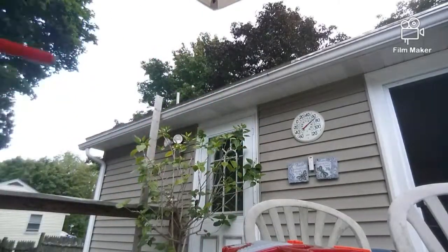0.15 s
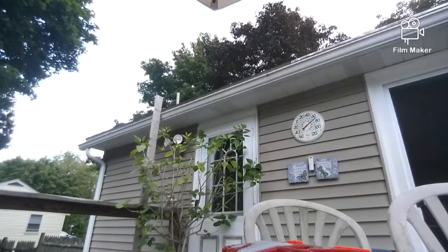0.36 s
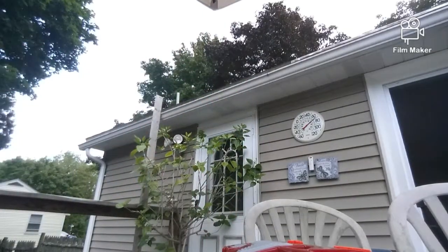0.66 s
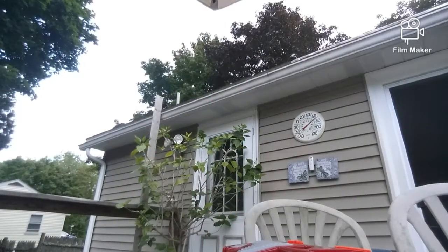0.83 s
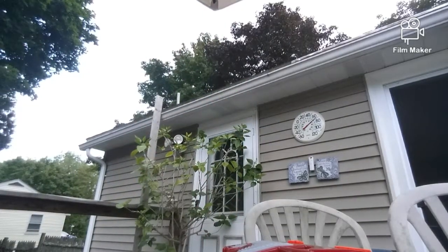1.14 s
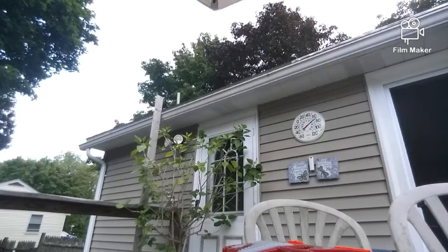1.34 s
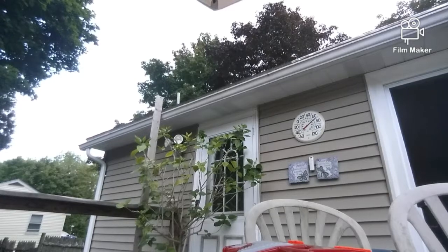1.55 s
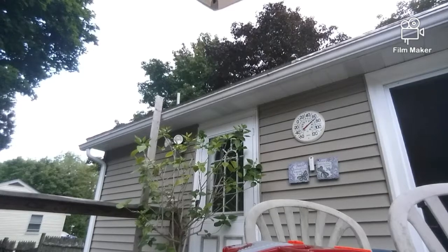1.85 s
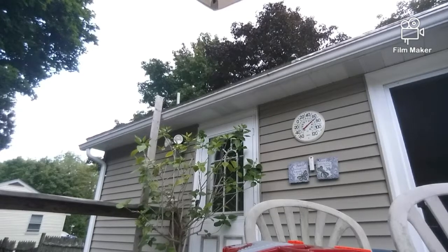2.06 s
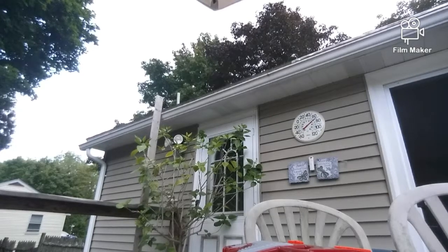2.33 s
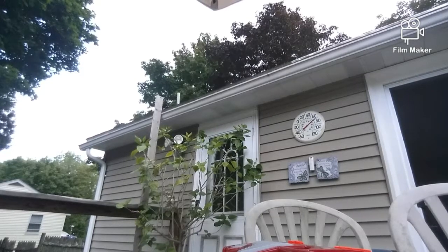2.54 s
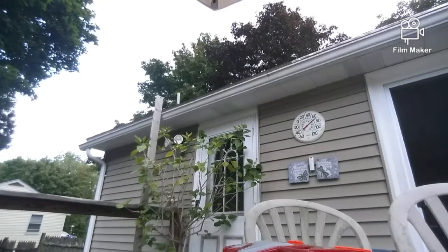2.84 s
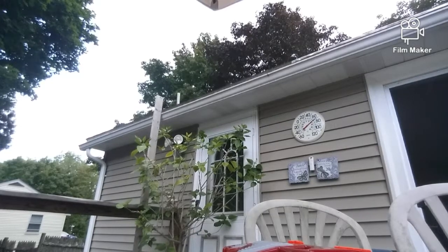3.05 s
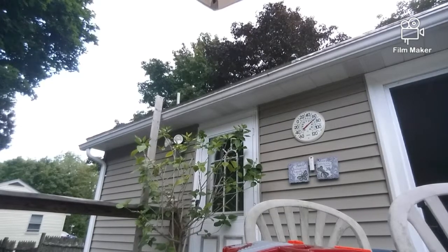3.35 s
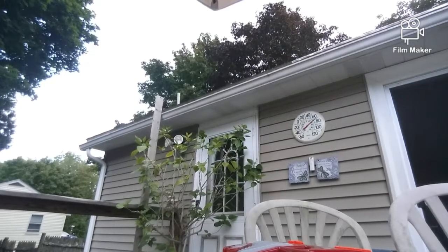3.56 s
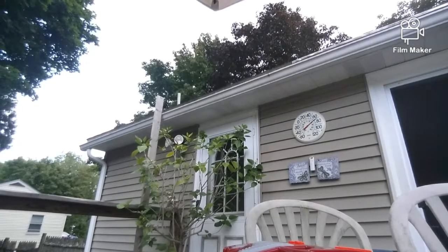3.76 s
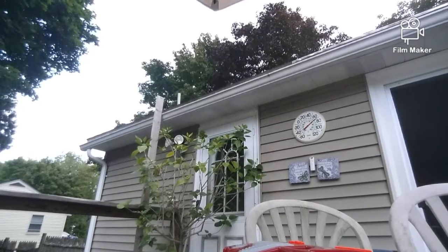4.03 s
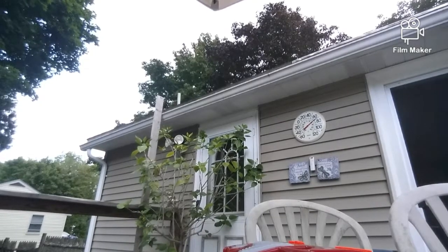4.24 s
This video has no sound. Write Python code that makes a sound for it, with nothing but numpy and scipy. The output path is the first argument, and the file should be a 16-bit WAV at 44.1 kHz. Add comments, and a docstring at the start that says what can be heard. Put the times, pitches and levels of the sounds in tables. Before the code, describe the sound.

Close handling bumps and rumble, then a toy cork gun pops loudly and the cork thumps against something nearby.

```python
"""Toy cork gun on a garden deck

A cork gun is handled and fired beside a phone. The trigger scrapes, the cork pops with a fast rising
note as the piston shortens the barrel's air column, and the piston slams home. The cork thumps against
something near by and drops; deck and house wall reflect the sound. Hands rumble and scuff on the phone.
The background sinks for about a second after the shot and returns as the hand takes hold again."""
import sys
import numpy as np
from scipy import signal
from scipy.fft import rfft, irfft
from scipy.io import wavfile

SR = 44100
rng = np.random.default_rng(int(sys.argv[2]) if len(sys.argv) > 2 else 0)


def transcribe(u):
    """Save the signal u as a 16-bit wav file named by the first command-line argument.

    u: samples, shape (n,) or (channels, n), limited to [-1, 1]; the rate is SR.
    q: integer samples, one column per channel.
    """
    v = np.clip(np.atleast_2d(u).T, -1, 1)
    q = np.round(v * 32767).astype(np.int16)
    wavfile.write(sys.argv[1], SR, q)


N = 193775
T = np.arange(N) / SR

# spectra of the open-air murmur and the microphone hiss: (frequency [Hz], gain [dB])
MURMUR_SPECTRUM = [(100, -6), (250, 5.5), (450, -1), (900, -10.5), (1400, -21), (2500, -33), (6000, -54.5)]
HISS_SPECTRUM = [(1000, -12), (3000, -14), (5400, -14), (6150, -8.5), (7000, -30), (10000, -30.5),
                 (11000, -9), (12100, 4), (13200, -0.5), (14500, -5.5), (16000, -9.5)]
# the hand shifts on the phone and settles: (time [s], rise [s], relative level [dB], fall [dB/s])
GRIP_SHIFTS = [(-.05, 0.1, -45, 6), (.105, .05, -28.5, 7), (1.24, 0.023, -29, 34), (2.26, 0.04, -27, 300.5),
               (3.075, 0.024, -34, 66), (3.25, 0.17, -39, 1.5), (3.59, 0.073, -24, 17)]
# soft bumps on the case: (time [s], frequency [Hz], level [dB], decay time [s])
CASE_BUMPS = [(0.219, 215, -20.5, 0.022), (.292, 200, -24, .014), (0.549, 146.7, -13.5, 0.013),
              (0.639, 99, -17.5, 0.019), (0.819, 76.3, -11.5, 0.016), (1.272, 130, -23, 0.02),
              (3.091, 148.1, -43.5, 0.041), (3.606, 291, -32, .025), (3.784, 682, -18.5, 0.002),
              (3.786, 59.6, -10, 0.033), (3.800, 127.2, -16.5, 0.04), (3.972, 141.6, -20, 0.021)]
# skin scuffing the case: (time [s], duration [s], level [dB], grit relative to that level [dB])
SKIN_STROKES = [(.271, 0.045, -40, -20), (.358, 0.046, -39, -20), (0.443, 0.032, -43, -20),
                (.648, 0.064, -43.5, -18), (0.808, 0.014, -37, -22), (.838, 0.025, -44, -20),
                (1.246, 0.025, -43, -26.5), (1.282, 0.02, -43.5, -25), (1.336, 0.074, -46.5, -20),
                (1.619, 0.013, -41, -28), (3.6, 0.06, -45.5, -46.5), (3.697, 0.0089, -46.5, -29),
                (3.757, .012, -44.5, -29), (3.861, 0.033, -44, -31), (3.917, 0.065, -41.5, -34)]
# spectra of the grip's rumble, the dull scuff and its grit: (frequency [Hz], gain [dB])
RUMBLE_SPECTRUM = [(12, -33.5), (20, 1), (49, -3), (86, 1.5), (125, -3.5), (158, -1), (313, -19.5),
                   (380, -17.5), (428, -31.5), (483, -30.5), (700, -39.5), (910, -58.5), (1540, -120)]
SCUFF_SPECTRUM = [(80, -13.5), (250, 10.5), (600, 0), (1000, -5.5), (1800, -27.5), (3000, -46),
                  (8000, -65.5)]
GRIT_SPECTRUM = [(400, -21.5), (1200, 3), (2200, -5), (3200, -21.5), (8000, -42.5)]
# transmission across the case to the right microphone port: (frequency [Hz], gain [dB])
CASE_TRANSMISSION = [(40, -21.5), (90, -18), (160, -13), (400, -12), (1500, -18)]
# fingers and trigger sliding on plastic, and a faint high hiss just before the shot (at 2.13 s):
# (time [s], duration [s], relative level [dB])
RUBS_AND_HISS = [(0.038, 0.057, -47.5), (.218, 0.021, -54), (0.519, 0.032, -52.5), (0.644, 0.07, -43),
                 (.684, 0.084, -41.5), (0.797, 0.026, -44.5), (0.925, 0.0089, -43), (0.94, .01, -37),
                 (1, 0.054, -53), (2.13, .14, -52), (2.253, 0.025, -21.5), (4.102, 0.01, -53),
                 (4.29, .07, -56.5)]
# plastic parts of the gun knocking: (time [s], relative level [dB], decay time [s])
PART_IMPACTS = [(2.2978, -9, 0.0027), (2.3020, -8.5, 0.002), (2.3128, -7.5, .0016), (2.3159, -3, 0.00091),
                (2.317, -17.5, .005), (2.388, -32, 0.0052)]
# modes of barrel and stock: (frequency [Hz], relative level [dB], time to fall 60 dB [s])
BARREL_MODES = [(178.9, -8, .14), (247, -6, .12), (395, -13.5, .13), (512.6, -7, .17), (678, 0.5, .16),
                (746, -6, .14), (885, -9, 0.2), (990, -9.5, 0.15), (1151, 0.5, 0.19), (1930, -19.5, .13),
                (2200, -21.5, .12), (3600, -21, .09)]
# spectra of the rubs and faint hiss, clacks, the cork's hit and its landing: (frequency [Hz], gain [dB])
RUB_AND_HISS_SPECTRUM = [(200, -19.5), (900, -1.5), (2200, 6), (3500, -12), (6000, -18), (10000, -14),
                         (13000, -4.5), (16000, -11)]
CLACK_SPECTRUM = [(80, -4.5), (200, 4.5), (500, 3.5), (1100, 1.5), (1600, -5), (2200, 7.5), (3000, -10),
                  (3700, -6.5), (5000, -17.5), (8000, -20), (16000, -18)]
HIT_SPECTRUM = [(60, -20), (150, -21), (260, -7.5), (400, 3), (520, 7), (620, 2), (780, -5), (1300, -10),
                (2100, -12), (3500, -23.5), (6000, -36.5), (10000, -36), (16000, -29.5)]
LANDING_SPECTRUM = [(100, -2.5), (350, 7.5), (700, -5), (1500, -14.5), (2700, -9), (3600, -36), (9000, -45),
                    (16000, -44)]
# microphone ports, the left muffled, the right with a treble resonance: (frequency [Hz], gain [dB])
LEFT_RESPONSE = [(100, -3), (650, 7), (1100, -9), (2100, -15), (3800, -8.5), (7000, -8.5), (12000, -18.5),
                 (16000, -20.5)]
RIGHT_RESPONSE = [(100, 8.5), (7500, -5), (10000, 7.5), (11300, 18), (12600, 28.5), (13600, 23),
                  (15000, 17.5), (16000, 12.5)]
# spectra of the low drone and of the near and far reflections: (frequency [Hz], gain [dB])
DRONE_SPECTRUM = [(20, -7.5), (90, 6.5), (170, 0), (300, -10), (700, -50)]
NEAR_SPECTRUM = [(100, -5.5), (500, -4), (1100, -1), (4000, 4), (13000, 1.5)]
FAR_SPECTRUM = [(100, 1), (600, -1.5), (2000, 4), (5000, 2), (13000, -4)]


def undb(db):
    """Amplitude ratio of a level in decibels."""
    return 10 ** (np.asarray(db) / 20)


def unit(x):
    """Normalisation to rms 1."""
    return x / np.sqrt(np.mean(x ** 2))


def colour(x, spectrum, size=8192):
    """Minimum-phase filter through points of (frequency [Hz], gain [dB])."""
    hz, db = np.transpose(spectrum)
    grid_hz = np.maximum(np.fft.rfftfreq(size, 1 / SR), 1)
    gain = undb(np.interp(np.log(grid_hz), np.log(hz), db))
    cepstrum = irfft(np.log(gain))
    cepstrum[1:size // 2] *= 2  # folding onto positive time makes the filter causal
    cepstrum[size // 2 + 1:] = 0
    return signal.fftconvolve(x, irfft(np.exp(rfft(cepstrum))))[:N]


def noise(spectrum):
    """Filtered Gaussian noise of rms 1."""
    return unit(colour(rng.standard_normal(N), spectrum))


def drift(rate_hz):
    """Interpolated random fluctuation with a spread near 1."""
    return np.interp(T * rate_hz, np.arange(N), rng.standard_normal(N))


def ramp(start, length):
    """Linear rise from 0 to 1."""
    return np.clip((T - start) / length, 0, 1)


def fade(start, decay, hold=0):
    """Sudden onset, optional hold, then exponential decay."""
    return (T >= start) * np.exp(-np.clip((T - start - hold) / decay, 0, 50))


def swell(start, rise, db, fall_db_per_s):
    """Linear rise to a level, then exponential decay."""
    return ramp(start, rise) * undb(db - np.clip(fall_db_per_s * (T - start - rise), 0, 200))


def stroke(start, length, skew=0.62):
    """Half-sine envelope that builds quickly and releases slowly; a smaller skew peaks sooner."""
    return np.sin(np.pi * ramp(start, length) ** skew)


def dip(fall_s=0.66, start_s=2.32, return_s=3.45, rise_s=0.36):
    """Depth, 0 to 1, to which the background sinks after the shot."""
    return ramp(start_s, fall_s) * (1 - ramp(return_s, rise_s))


def background(hiss_levels_db=(-69, -66.5)):
    """Ambient noise: a murmur partly coherent between the ports, over incoherent drone and hiss."""
    dip_db = -25.5 * dip()
    shared = noise(MURMUR_SPECTRUM)
    murmur = np.array([shared + noise(MURMUR_SPECTRUM) for _ in range(2)])
    murmur *= undb(-55 + dip_db + 2.1 * drift(2))
    drone = np.array([noise(DRONE_SPECTRUM) for _ in range(2)]) * undb(-55 + 0.67 * dip_db)
    hiss_dip_db = -27.5 * dip(fall_s=0.4)
    hiss = np.array([undb(db + hiss_dip_db) * noise(HISS_SPECTRUM) for db in hiss_levels_db])
    return murmur + drone + hiss


def bumps(contact_s=0.0022):
    """Damped vibration of the case after each soft impact."""
    return sum(undb(db) * ramp(start, contact_s) * fade(start, decay)
               * np.sin(2 * np.pi * hz * (T - start)) for start, hz, db, decay in CASE_BUMPS)


def judder(start_s=0.535, length_s=0.17, start_hz=147.8, sag_hz_per_s=75):
    """Stick-slip oscillation of a fingertip on the case, slowing as it goes."""
    slip_hz = start_hz - sag_hz_per_s * np.clip(T - start_s, 0, length_s)
    pressure = stroke(start_s, length_s, skew=0.86) * undb(-18 + 2 * drift(140))
    return pressure * np.sin(2 * np.pi * np.cumsum(slip_hz * (T >= start_s)) / SR)


def scuffs(grain_db=4):
    """Sliding friction of skin on the case: a dull scrape with some grit on top."""
    dull, grit = noise(SCUFF_SPECTRUM), noise(GRIT_SPECTRUM)
    scrapes = sum(stroke(start, length) * undb(db) * (dull + undb(grit_db) * grit)
                  for start, length, db, grit_db in SKIN_STROKES)
    return undb(grain_db * drift(300)) * scrapes


def handling(right_rumble_db=-16, flutter_db=2, dip_db=-10.5):
    """Structure-borne sound: rumble, bumps and friction cross the case, mostly to the left port."""
    grip = np.sqrt(sum(swell(*shift) ** 2 for shift in GRIP_SHIFTS))  # the shifts add in power
    envelope = grip * undb(flutter_db * drift(35) + dip_db * dip())
    left = envelope * noise(RUMBLE_SPECTRUM) + bumps() + judder() + scuffs()
    right_rumble = undb(right_rumble_db) * envelope * noise(RUMBLE_SPECTRUM)
    return np.array([left, colour(left, CASE_TRANSMISSION) + right_rumble])


def reflections(x):
    """Reverberation: dense reflections from deck and furniture, a faint tail from house and trees."""
    def tail(delay_s, t60_s):
        return unit(fade(delay_s, t60_s / np.log(1000)) * rng.standard_normal(N)) / np.sqrt(N)
    near = colour(undb(-11) * tail(delay_s=0.0054, t60_s=0.18), NEAR_SPECTRUM)
    far = colour(undb(-26) * tail(delay_s=0.03, t60_s=0.6), FAR_SPECTRUM)
    return signal.fftconvolve(x, near + far)[:N]


def rubs_and_hiss(grain_db=1.5):
    """Dry friction of fingers and trigger on plastic, and a faint high hiss just before the shot."""
    envelope = sum(undb(db) * stroke(start, length) for start, length, db in RUBS_AND_HISS)
    grainy_noise = unit(noise(RUB_AND_HISS_SPECTRUM) * undb(grain_db * drift(900)))
    return undb(-21.5) * envelope * grainy_noise


def cork(hit_s=2.4817, rattle_decay_s=0.0067, landing_s=3.068):
    """Impact excitation: an impulse and a short rattle drive the struck surface; a soft landing follows."""
    force = undb(-5) * fade(hit_s, rattle_decay_s) * rng.standard_normal(N)
    force[int(hit_s * SR)] -= undb(13)  # the impulse
    landing = swell(landing_s, rise=0.009, db=-59.5, fall_db_per_s=305) * noise(LANDING_SPECTRUM)
    return colour(force, HIT_SPECTRUM) + landing


def mechanism(slam_s=2.3137):
    """Modal ringing: catch and piston clack, and the piston's stop excites barrel and stock."""
    force = sum(undb(db) * fade(start, decay) for start, db, decay in PART_IMPACTS)
    clacks = colour(force * rng.standard_normal(N), CLACK_SPECTRUM)
    ring = sum(undb(db) * fade(slam_s, t60 / np.log(1000)) * np.sin(2 * np.pi * hz * (T - slam_s))
               for hz, db, t60 in BARREL_MODES)
    return undb(-3.5) * clacks + undb(-25) * ring


def pop(fire_s=2.2976, travel_s=0.0161, attack_s=0.0026, start_m=0.128, end_m=0.073, overtone_db=-25):
    """Quarter-wave resonance: the pitch rises as the muzzle opens and the piston shortens the air."""
    progress = ramp(fire_s, travel_s) ** 3.8  # the piston gathers speed
    column_m = start_m + (end_m - start_m) * progress
    open_pipe_hz = 343 / (4 * column_m)
    muzzle_lowering = 0.66 * fade(fire_s, decay=0.0024)  # passes as the cork clears the muzzle
    hz = open_pipe_hz * (1 - muzzle_lowering)
    phase = 2 * np.pi * np.cumsum(hz * (T >= fire_s)) / SR
    tone = np.sin(phase) + undb(overtone_db) * np.sin(3 * phase)
    cork_burst = undb(-2.5) * fade(fire_s, decay=0.0014, hold=0.0025)
    piston_push = undb(-11.5) * fade(fire_s, decay=0.0013, hold=travel_s)
    return ramp(fire_s, attack_s) * (cork_burst + piston_push) * tone


def scene(left_lag_s=0.00058):
    """Superposition of airborne sound, handling and background at two ports, the left slightly later."""
    direct = pop() + mechanism() + cork() + rubs_and_hiss()
    airborne = np.array([colour(direct + reflections(direct), response)
                         for response in (LEFT_RESPONSE, RIGHT_RESPONSE)])
    left, right = airborne + handling() + background()
    return np.array([np.interp(T - left_lag_s, T, left), right])


def record(dry):
    """Soft saturation and band limiting: the phone rounds the pop's peaks and cuts above 16 kHz."""
    rounded = dry / (1 + dry ** 4) ** (1 / 4)
    lowpass = signal.ellip(10, 0.2, 80, 16000, fs=SR, output="sos")
    return signal.sosfilt(lowpass, rounded)


dry = scene()
out = record(dry)
transcribe(out)
```